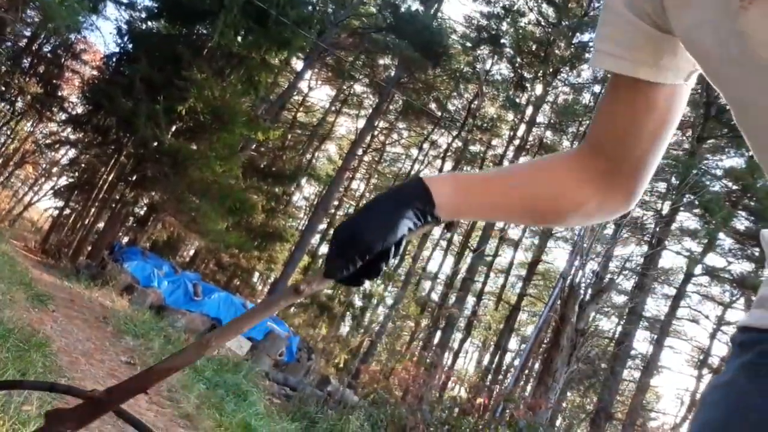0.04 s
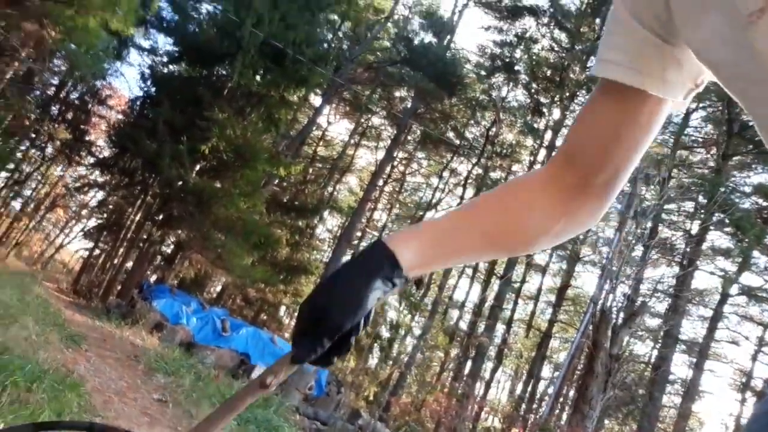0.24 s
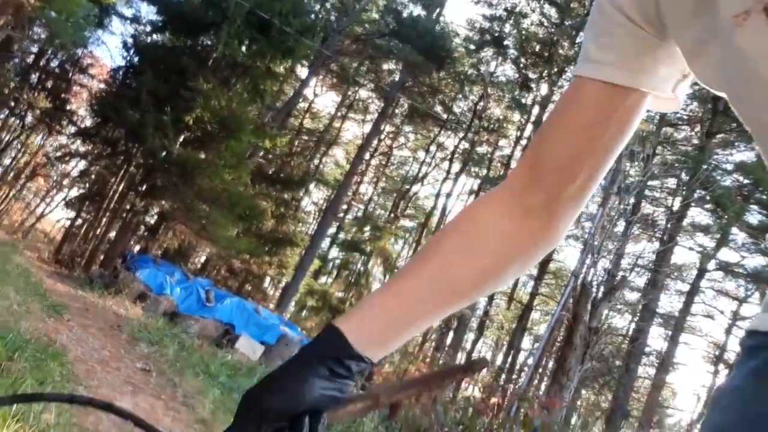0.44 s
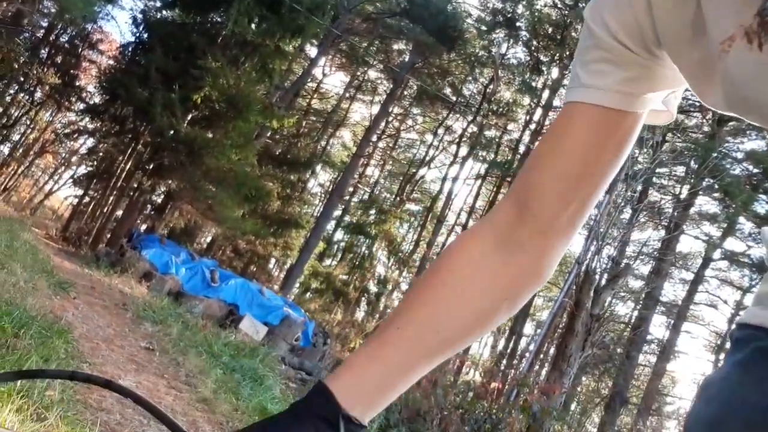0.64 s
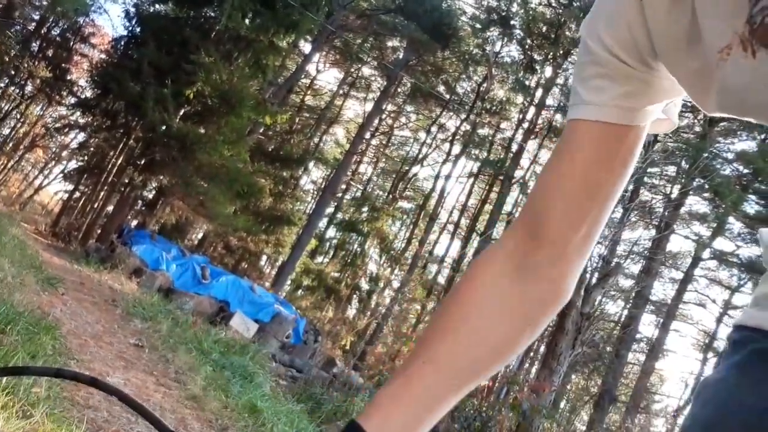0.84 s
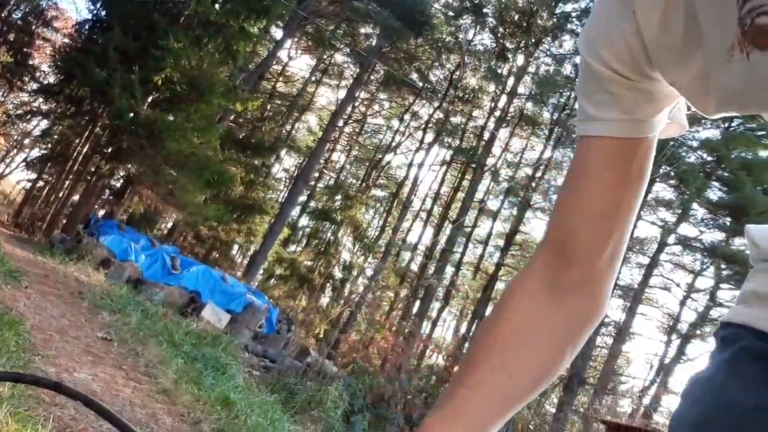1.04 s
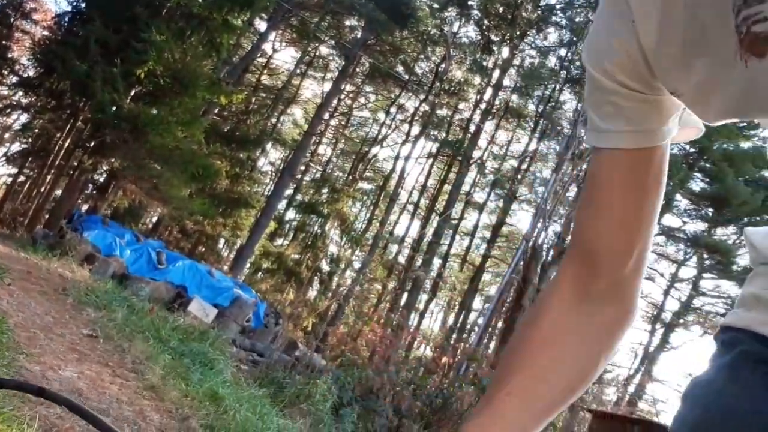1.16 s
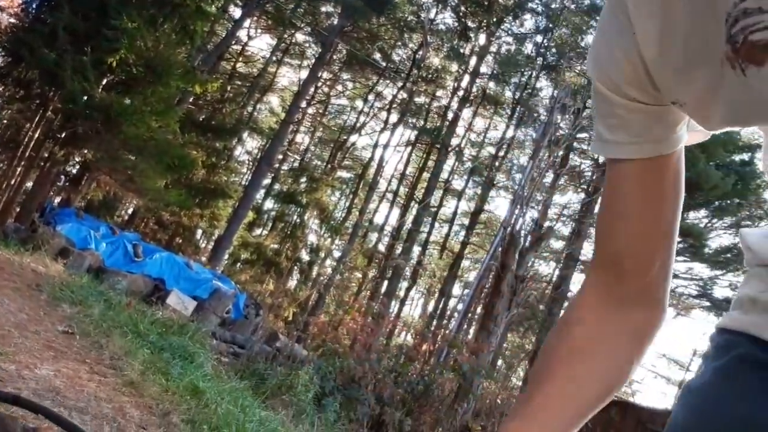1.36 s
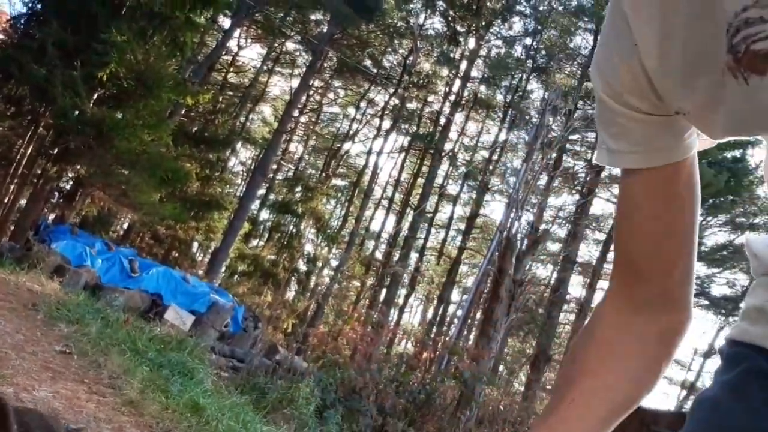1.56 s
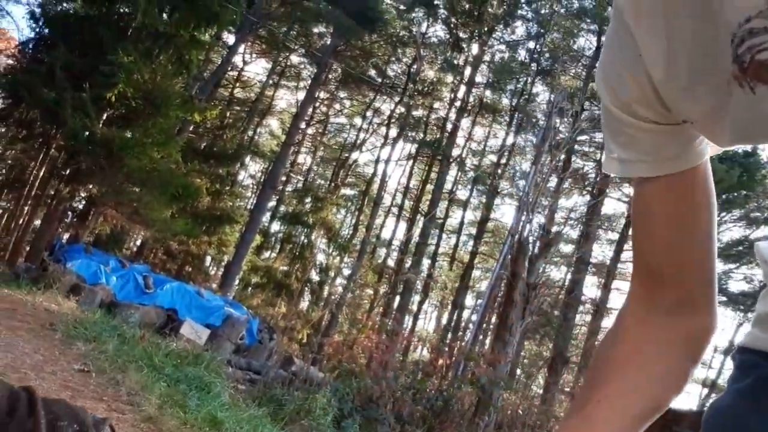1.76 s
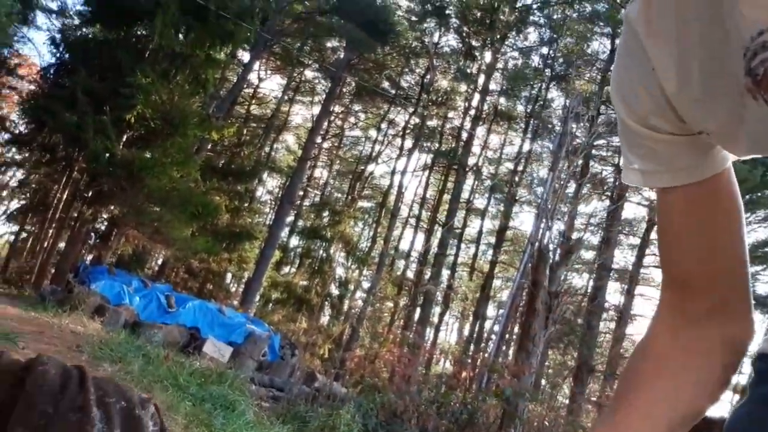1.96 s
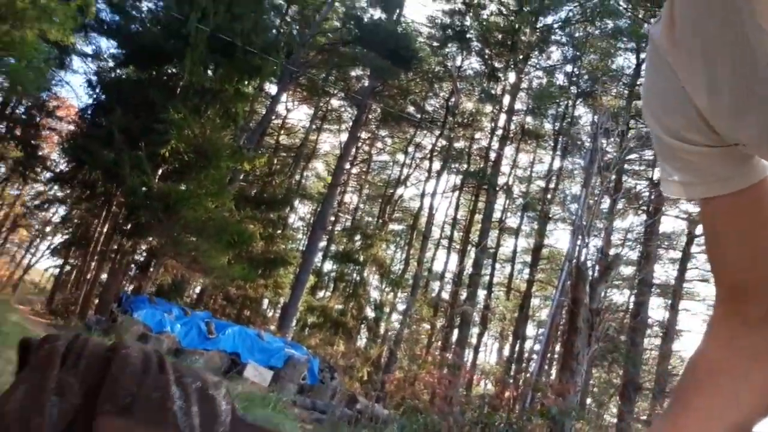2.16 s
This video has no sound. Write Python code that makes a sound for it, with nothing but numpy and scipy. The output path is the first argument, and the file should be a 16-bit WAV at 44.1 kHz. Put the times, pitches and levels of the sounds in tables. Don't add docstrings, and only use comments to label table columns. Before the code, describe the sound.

Water drips from soaked cloth, very close to the microphone, in a quiet woodland clearing. Sharp splats, a wet swish and a strong low thump cluster around 0.2 seconds, with more splats at 0.35 and 0.48. Muffled bumps rumble from 0.6 to 0.8. Sparse plips follow from 0.9, thickening with soft cloth sliding around 1.2-1.75, then a last drip near 2.05. Crickets, leaves and thin bird peeps stay faint.

```python
import sys
import numpy as np
from scipy import signal
from scipy.fft import rfft, irfft
from scipy.io import wavfile

SR = 44100
rng = np.random.default_rng(int(sys.argv[2]) if len(sys.argv) > 2 else 0)


def store_pcm(level_fs):
    pcm = np.round(np.clip(level_fs, -1, 1) * 32767).astype(np.int16)
    wavfile.write(sys.argv[1], SR, np.atleast_2d(pcm).T)


def gain_from_db(level_db):
    decades = np.asarray(level_db, float) / 20
    return 10 ** decades


N = 96755
T = np.arange(N) / SR


def rms_one(x):
    return x / np.sqrt(np.mean(x ** 2) + 1e-20)


def level_curve(rows):
    s, db = np.transpose(rows)
    return np.interp(T, s, db)


def drift(rate_hz):
    r = np.exp(-80 * np.pi * rate_hz / SR)
    settle = 2000
    noise = rng.standard_normal(N // 40 + settle + 2)
    slow = signal.lfilter([1], [1, -2 * r, r * r], noise)[settle:]
    return np.interp(np.arange(N) / 40, np.arange(len(slow)), rms_one(slow))


def colour(x, spectrum):
    hz, db = np.transpose(spectrum)
    top_hz = 15750
    f = np.maximum(np.arange(N // 2 + 1) * SR / N, 1)
    octaves_below = np.maximum(np.log2(hz[0] / f), 0)
    octaves_above = np.maximum(np.log2(f / hz[-1]), 0)
    gain_db = np.interp(np.log(f), np.log(hz), db) - 18 * (octaves_below + octaves_above)
    return rms_one(irfft(rfft(x) * gain_from_db(gain_db) * (f < top_hz), N))


def add(out, s, sound):
    i = max(int(s * SR), 0)
    out[i:i + len(sound)] += sound[:N - i]


def resonate(x, hz, width_hz):
    r = np.exp(-np.pi * width_hz / SR)
    feedback = [1, -2 * r * np.cos(2 * np.pi * hz / SR), r * r]
    return signal.lfilter([(1 - r * r) / 2, 0, (r * r - 1) / 2], feedback, x)


def resonate_twice(x, hz, width_hz):
    return resonate(resonate(x, hz, width_hz), hz, width_hz)


def leaves():
    # frequency in Hz, density in dB per Hz.
    leaf_colour = [(250, -23), (550, 1.5), (1500, -12), (4000, -45), (15800, -10.5)]
    return gain_from_db(-84.5) * colour(rng.standard_normal(N), leaf_colour)


def rumble():
    # time in s, level in dB.
    rumble_level = [(0, -53.5), (.08, -61.5), (.33, -54.5), (.5, -55.5), (.565, -64), (.62, -42), (.8, -50),
                    (.88, -56.5), (1.1, -60.5), (1.6, -59.5), (1.93, -58), (2.0, -52), (2.1, -58),
                    (2.19, -46.5)]
    # frequency in Hz, density in dB per Hz.
    rumble_colour = [(30, -6.5), (60, 4), (180, -7.5), (260, -19), (500, -34.5)]
    level_db = level_curve(rumble_level) + drift(3.2)
    return gain_from_db(level_db) * colour(rng.standard_normal(N), rumble_colour)


def crickets():
    # time in s, level in dB.
    trill_level = [(0, -74), (.57, -62.5), (.61, -67.5), (.7, -60), (.9, -68.5), (1.1, -74), (1.5, -70),
                   (1.75, -71), (2.0, -68), (2.19, -61)]
    chirps_per_s, start_s, duty = 44.5, .012, .55
    top_hz, fall_hz, chorus_db = 4400, 800, -11
    beat = np.minimum(((T - start_s) * chirps_per_s) % 1 / duty, 1)
    hz = top_hz - fall_hz * beat
    trill = np.sin(2 * np.pi * np.cumsum(hz) / SR) * np.sin(np.pi * beat)
    trill = trill + .3 * np.roll(trill, 310)
    chorus = rms_one(resonate_twice(rng.standard_normal(N), 4000, 500))
    return gain_from_db(level_curve(trill_level) + 3.5 * drift(33)) * (trill + gain_from_db(chorus_db) * chorus)


def katydid():
    tone_hz, level_db = 7530, -73.5
    throbs_per_s, start_s = 17.6, .044
    wing_phase = 2 * np.pi * throbs_per_s * (T - start_s) + .3 * drift(2)
    throb = np.maximum(np.sin(wing_phase) + .2, 0)
    hz = tone_hz + 80 * drift(150)
    tone = gain_from_db(3 * drift(60)) * np.sin(2 * np.pi * np.cumsum(hz) / SR)
    return gain_from_db(level_db) * throb * tone


def bird():
    # start in s, length in s, first pitch in Hz, top pitch in Hz, level in dB.
    peeps = [
        (0.125, .1, 7400, 8350, -68),
        (1.625, .095, 7900, 8500, -66),
    ]
    out = np.zeros(N)
    for s, length, from_hz, top_hz, db in peeps:
        u = T[:int(length * SR)] / length
        hz = from_hz + (top_hz - from_hz) * np.sin(.8 * np.pi * u)
        whistle = np.sin(2 * np.pi * np.cumsum(hz) / SR)
        add(out, s, gain_from_db(db) * np.sqrt(np.sin(np.pi * u)) * whistle)
    return out * gain_from_db(2 * drift(46))


def fizz():
    grains_per_s = 500
    sizes = gain_from_db(5 * np.minimum(rng.exponential(1, N), 3)) * rng.choice([-1, 1], N)
    chance = grains_per_s * gain_from_db(5 * drift(8)) / SR
    grains = sizes * (rng.random(N) < chance)
    dealt = rng.integers(0, 12, N)
    out = np.zeros(N)
    for k, hz in enumerate(np.geomspace(2000, 11500, 12)):
        out += resonate_twice(grains * (dealt == k) + 1e-18, hz, 0.27 * hz)
    return rms_one(out)


def rustle():
    # time in s, level in dB.
    rustle_level = [(0, -64), (.17, -69.5), (.335, -66), (.36, -63.5), (.49, -60), (.57, -68), (.9, -68),
                    (1.3, -64.5), (1.44, -65.5), (1.47, -64), (1.66, -63.5), (1.7, -68.5), (1.98, -69.5),
                    (2.03, -64), (2.19, -63.5)]
    # frequency in Hz, density in dB per Hz.
    fine_colour = [(1600, -30), (2300, 0), (3200, 0), (4300, -1), (9000, 0), (15800, -8.5)]
    band_follows = [1, 0.18, 0.067, 0.18, 0.5]
    patchy_db, patches_per_s, fizz_db = 1.6, 6, -10
    level_db = level_curve(rustle_level)
    swing_db = level_db - level_db.mean()
    hiss = rfft(colour(rng.standard_normal(N), fine_colour))
    f = np.arange(N // 2 + 1) * SR / N
    edges = [0, 3200, 6100, 8000, 11000, SR]
    patches = np.zeros(N)
    for low, high, follow in zip(edges, edges[1:], band_follows):
        band = irfft(hiss * (f >= low) * (f < high), N)
        patches += gain_from_db(patchy_db * drift(patches_per_s) + follow * swing_db) * band
    return gain_from_db(level_db) * (patches + gain_from_db(fizz_db) * fizz())


def drag():
    # time in s, level in dB.
    drag_level = [(0, -56), (.17, -64.5), (.4, -65), (.45, -74.5), (1.45, -74.5), (1.55, -65), (1.72, -73),
                  (1.8, -77.5), (1.97, -79), (2.0, -70.5), (2.19, -66.5)]
    # frequency in Hz, density in dB per Hz.
    drag_colour = [(300, -1.5), (650, -1.5), (1100, -8.5), (1800, 0.5), (2300, -0.5), (2900, -9),
                   (4000, -1.5), (5500, -9.5)]
    level_db = level_curve(drag_level) + 0.81 * drift(31)
    return gain_from_db(level_db) * colour(rng.standard_normal(N), drag_colour)


def bumps():
    # crest in s, peak in dB, frequency in Hz, half length in cycles.
    knocks = [(0.004, -32, 63.4, 1.22), (0.2185, -16.5, 197, 0.87), (0.2272, -34, 75, 1),
              (0.2159, -29, 375, 1.24), (0.436, -38, 62, 0.46), (0.613, -35.5, 121, 1.45),
              (0.644, -46.5, 70, 2.4), (0.6804, -22.5, 133, 0.94), (0.691, -23.5, 106, 0.74),
              (0.673, -29.5, 200, 0.78), (0.706, -25, 139, 0.77), (0.738, -31, 120, 3.1),
              (0.752, -30, 148, 0.48), (0.76, -27, 64, 0.59), (0.776, -33, 88, 0.73), (0.817, -42, 99, 1.9),
              (0.704, -41.5, 282, 1.24), (0.863, -50, 151, 0.72), (0.981, -49, 64, 1.2),
              (1.65, -48, 62, 0.77), (0.355, -54, 81.5, 0.85), (1.969, -42.5, 93, 0.8),
              (1.975, -41, 96, 0.35), (1.99, -31, 75, 0.98), (2.04, -48, 61, 2.5), (2.184, -43, 69.4, 0.61),
              (2.167, -42.5, 64, 4)]
    out = np.zeros(N)
    for s, db, hz, cycles in knocks:
        turns = (T - s) * hz
        steepness = np.where(turns < 0, 2.6, 2.1)
        swell = np.exp(-2 * np.abs(turns / cycles) ** steepness)
        out += gain_from_db(db) * np.cos(2 * np.pi * turns) * swell
    return out


def swishes():
    # start in s, rms level in dB, 60 dB fade in s, centre in Hz.
    slides = [(0.194, -49.5, 0.2, 1630), (0.196, -44, 0.13, 446), (0.243, -52, 0.14, 695),
              (0.349, -43.5, 0.061, 1870), (0.349, -56, 0.22, 670), (0.349, -56, 0.4, 3340),
              (0, -60.5, 1.73, 1650), (1.275, -71.5, 0.46, 556), (0.577, -66.5, .8, 920),
              (0.577, -61.5, 0.23, 600), (0.577, -62.5, 0.67, 2400), (0.577, -62, 0.061, 3480),
              (1.575, -61, 0.7, 704), (1.598, -55, 0.17, 2470)]
    out, noise = np.zeros(N), rng.standard_normal((2, N))
    lumps = gain_from_db(2.7 * drift(46))
    for k, (s, db, t60, hz) in enumerate(slides):
        band = signal.butter(2, [hz / 1.414, hz * 1.327], "band", fs=SR, output="sos")
        after = np.maximum(T - s, 0)
        onset = np.minimum(after / 0.0027, 1)
        fade = gain_from_db(db - 60 * after / t60)
        out += rms_one(signal.sosfilt(band, noise[k % 2])) * lumps * fade * onset
    return out


def plips():
    # start in s, peak in dB, pitch in Hz.
    small_bubbles = [(0.315, -40, 4200), (0.917, -51.5, 2090), (0.939, -40, 4860), (0.967, -41, 4000),
                     (1.1315, -47, 2590), (1.144, -55, 2640), (0.955, -51, 4320), (0.992, -53, 2520),
                     (1.027, -56, 2230), (1.061, -64, 2330), (1.329, -55.5, 2150), (1.416, -52.5, 2390),
                     (1.488, -47, 5000), (1.215, -38.5, 2780), (1.244, -40.5, 4050), (1.257, -42, 3440),
                     (1.381, -38, 5570), (1.522, -34, 4400), (1.597, -35, 2460), (1.539, -52, 2520),
                     (1.549, -55, 2650), (1.603, -42, 2770), (1.634, -48, 2130), (1.654, -49, 2250),
                     (1.669, -50, 2290), (1.692, -51, 2250), (1.712, -59, 2300), (1.751, -36, 6300),
                     (1.756, -39, 5770), (2.053, -34.5, 4500)]
    # start in s, peak in dB,
    # pitch in Hz, 60 dB decay in s.
    timed_bubbles = [(0.2392, -26, 950, 0.009), (0.239, -31, 1450, .006), (0.241, -36, 730, .04),
                     (1.598, -46, 1200, .015), (1.995, -54, 2700, .01), (.351, -44, 700, .04),
                     (.353, -44, 1290, .025), (.362, -46, 1850, .02), (.374, -50, 2600, .02),
                     (0.675, -47, 5200, .008), (1.131, -50, 2010, 0.025), (.976, -57, 1700, .02),
                     (1.012, -56, 1700, .025), (1.619, -51, 830, .03), (1.196, -39, 4870, 0.0051),
                     (.301, -40, 8870, 0.0073), (1.559, -46, 4350, 0.017), (2.054, -48.5, 2600, 0.02),
                     (1.531, -50, 1370, 0.035), (1.56, -45, 1250, 0.025), (1.581, -49, 735, 0.024),
                     (1.636, -48, 645, 0.026), (.201, -46, 1250, .03), (.222, -47, 1950, .015),
                     (.275, -49, 760, .04), (.325, -49, 2550, .015), (.579, -47, 520, .04),
                     (.584, -39, 362, .05), (.597, -47, 300, .04)]
    decay_cycles, pitch_rise, swell_s = 30, 0.02, .0007
    out, t = np.zeros(N), T[:2500]
    bubbles = [(s, db, hz, decay_cycles / hz) for s, db, hz in small_bubbles] + timed_bubbles
    for s, db, hz, t60 in bubbles:
        phase = 2 * np.pi * hz * t * (1 + pitch_rise * t / t60)
        swell = np.minimum(t / swell_s, 1)
        add(out, s, gain_from_db(db - 60 * t / t60) * swell * np.sin(phase))
    return out


def splats():
    # start in s, peak in dB, strongest ring in Hz, ring over the crack in dB.
    big_drops = [(0.1823, -32.5, 3800, -4.5), (0.1951, -28, 8170, 1), (0.2016, -35, 8040, 21),
                 (0.214, -34, 3620, 5), (0.2252, -37, 3820, 11), (0.2381, -25, 4440, -4.5),
                 (0.29, -40.5, 8800, -4), (0.361, -30, 4080, -3.5), (0.476, -26, 3940, 39),
                 (0.846, -49.5, 4840, 4), (0.8608, -48.5, 8500, 4), (0.9941, -42, 4200, -4),
                 (1.052, -48, 12800, 12), (1.0934, -48, 10600, 10), (1.334, -47.5, 8200, -20),
                 (1.4571, -41, 6700, 8), (1.5126, -46, 4520, -34), (1.5966, -34, 8800, -6),
                 (1.6681, -47.5, 8200, -21), (2.013, -41.5, 10000, 10), (2.095, -42, 3430, 0)]
    # start in s, peak in dB.
    droplets = [(.339, -62), (.722, -54.5), (1.555, -54), (1.616, -50), (1.739, -55), (1.757, -53),
                (1.782, -57), (1.841, -59), (1.929, -64), (2.043, -52), (2.074, -47.5), (2.152, -51),
                (2.178, -50)]
    tick_hz, tick_ring_db = 9600, -1
    crack_t60_s, ring_t60_s, rise_s = .006, .0058, .0024
    out, t = np.zeros(N), T[:1000]
    bright = signal.butter(2, [2000, 11000], "band", fs=SR, output="sos")
    rise = np.minimum(t / rise_s, 1) ** 2
    drops = big_drops + [(s, db, tick_hz, tick_ring_db) for s, db in droplets]
    for s, db, hz, ring_db in drops:
        noise = rng.standard_normal(len(t))
        crack = signal.sosfilt(bright, noise) * gain_from_db(-60 * t / crack_t60_s)
        ring = rms_one(resonate_twice(noise, hz, 0.34 * hz)) * gain_from_db(ring_db - 60 * t / ring_t60_s)
        burst = rise * (crack + ring)
        add(out, s, gain_from_db(db) * burst / np.abs(burst).max())
    return out


def scene():
    background = leaves() + rumble() + crickets() + katydid() + bird()
    handling = rustle() + drag() + bumps() + swishes()
    water = plips() + splats()
    water = water + gain_from_db(-18) * np.roll(water, 190)
    return (background + handling + water)[None]


def roll_off(x):
    return signal.sosfilt(signal.butter(12, 16480, fs=SR, output="sos"), x)


def record(dry):
    # centre in Hz, width in Hz, gain in dB.
    hollows = [
        (3150, 700, -8),
        (6590, 4600, -3),
    ]
    for hz, width_hz, db in hollows:
        dry = dry - (1 - gain_from_db(db)) * resonate(dry, hz, width_hz)
    bass_cut = signal.butter(2, 45, "high", fs=SR, output="sos")
    top_cut = signal.cheby2(12, 40, 16500, fs=SR, output="sos")
    mix = signal.sosfilt(top_cut, signal.sosfilt(bass_cut, dry))
    return roll_off(mix)


dry = scene()
out = record(dry)
store_pcm(out)
```